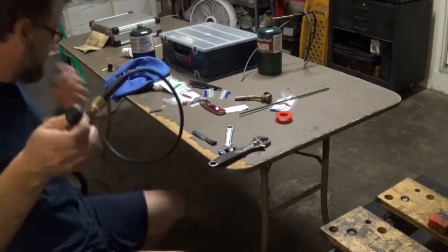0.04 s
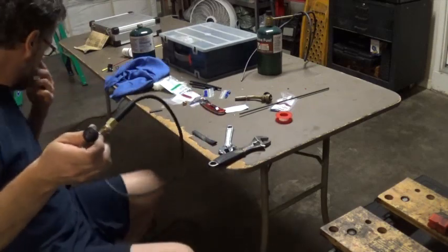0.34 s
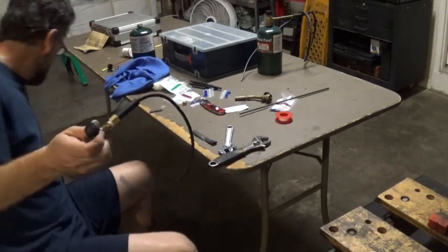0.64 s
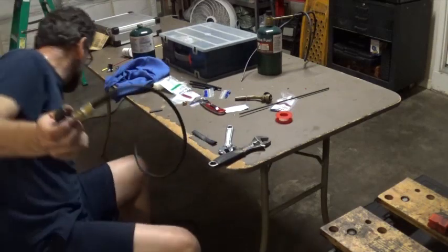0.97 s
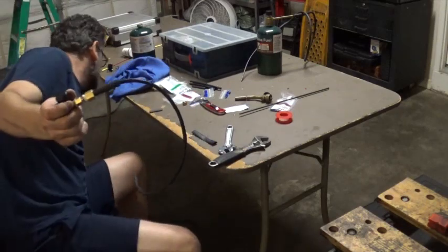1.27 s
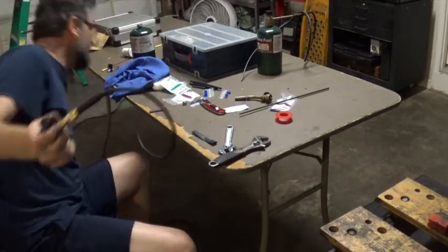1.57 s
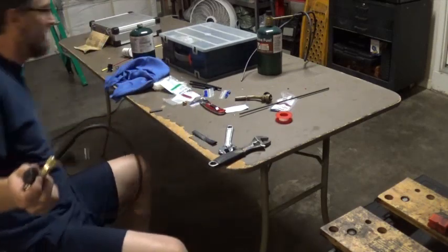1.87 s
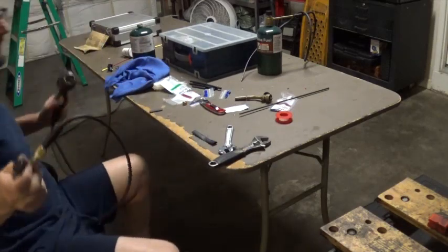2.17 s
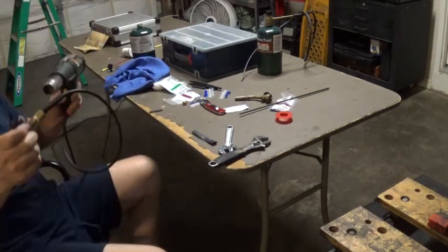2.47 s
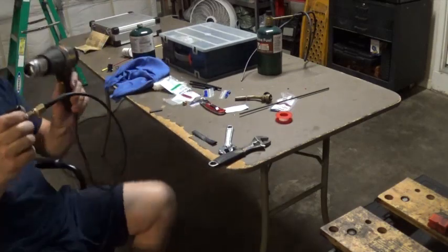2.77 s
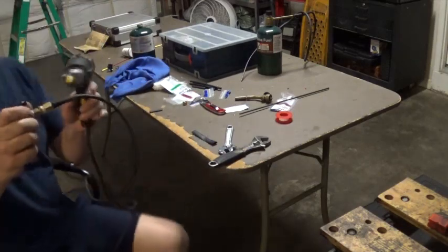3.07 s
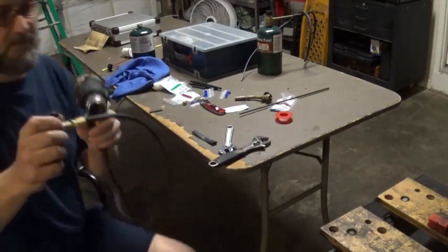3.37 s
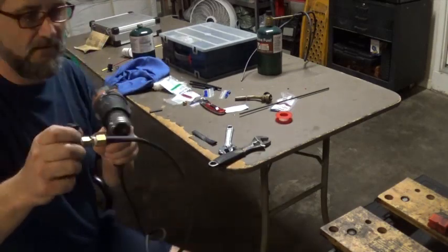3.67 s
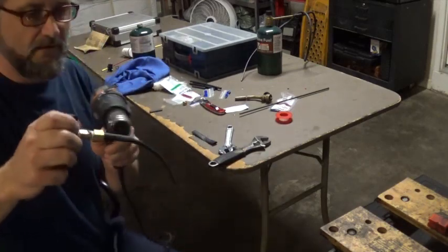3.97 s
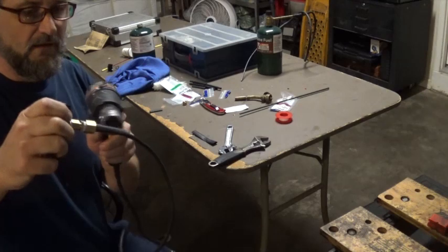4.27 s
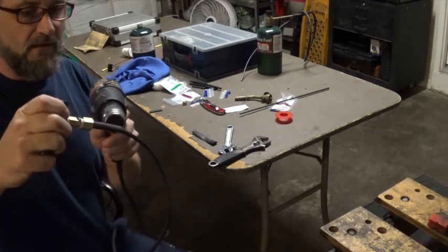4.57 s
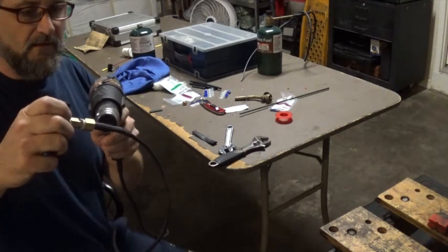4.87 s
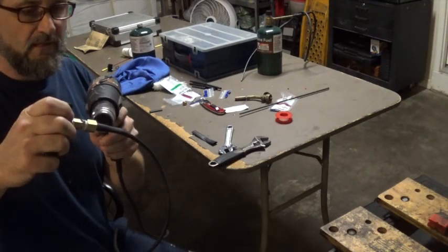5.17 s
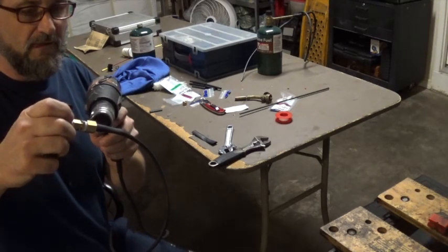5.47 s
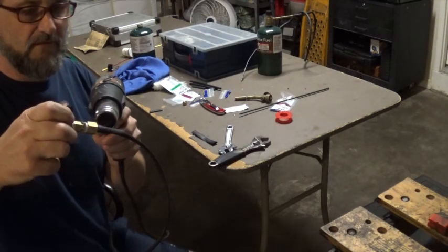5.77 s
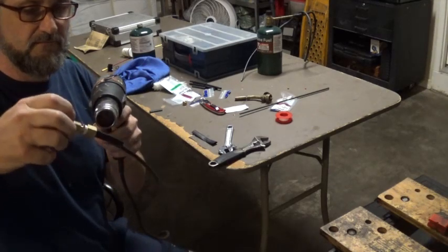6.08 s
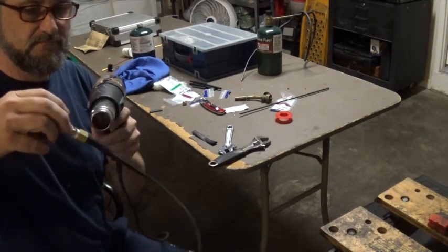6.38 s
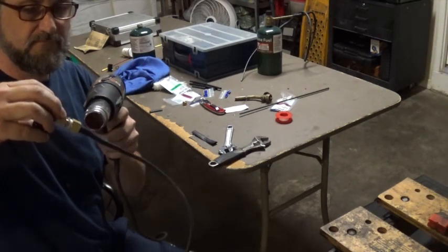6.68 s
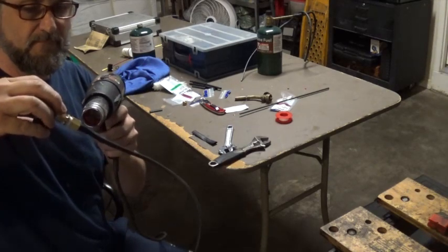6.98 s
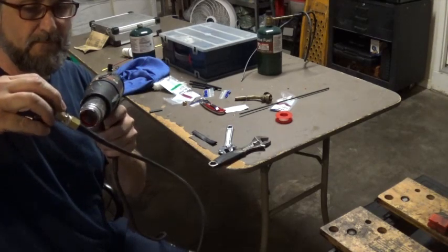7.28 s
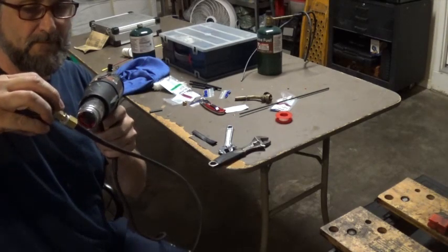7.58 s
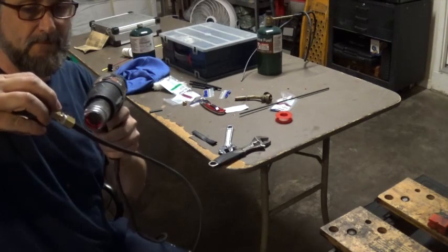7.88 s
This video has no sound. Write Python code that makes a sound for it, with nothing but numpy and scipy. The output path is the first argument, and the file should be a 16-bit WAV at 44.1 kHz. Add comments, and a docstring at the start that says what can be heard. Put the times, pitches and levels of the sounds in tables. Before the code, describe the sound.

Over faint garage room tone, a short dull scrape and a couple of plastic knocks sound in the first 0.3 seconds, followed by soft rustling. A light tap comes at 1.1 seconds, a metal tool clatters briefly on the table at 1.4, and small brass fittings tick around 2. At 2.2 seconds a switch snaps and an electric heat gun spins up with a rising whine. A hollow case clacks at 2.4, and the switch clicks sharply to high at 2.7. By about 3.3 seconds the gun is at full speed, a steady rush of air with nozzle hiss and a wavering high fan whistle. Around 3.7 the air jet briefly brushes a hose. The gun keeps blowing until the end at about 8 seconds, fairly close and slightly left, its tone shifting gently as it is moved. The room adds a short echo.

```python
"""A bare garage: tools knock, rustle and clatter at a work table as an electric heat gun is picked up.
Each contact rings a body's modes and the room answers. The switch snaps and the motor spins up to
about 235 turns a second: air rushes through the barrel's resonances and hisses out of the nozzle,
and the fan whines on multiples of the shaft speed, strongest on the 22nd."""
import sys
import numpy as np
from scipy import signal
from scipy.fft import rfft, irfft, next_fast_len
from scipy.io import wavfile
from scipy.ndimage import uniform_filter1d, map_coordinates

SR = 44100
rng = np.random.default_rng(int(sys.argv[2]) if len(sys.argv) > 2 else 0)


def dump(signal):
    """Clip the signal to [-1, 1] and save it as 16-bit WAV at the path in sys.argv[1]."""
    limited = np.clip(np.atleast_2d(signal).T, -1, 1)
    pcm = np.round(limited * 32767).astype(np.int16)
    wavfile.write(sys.argv[1], SR, pcm)


N = 358533
BLADE_ORDER = 22  # blade tone / shaft speed


def amp(db):
    """dB to gain."""
    return 10 ** (np.asarray(db) / 20)


def unit(x):
    """Scale to rms 1."""
    return x / np.sqrt(np.mean(x ** 2) + 1e-20)


def along(points, hz):
    """Read (f/Hz, value) points on a log axis."""
    f, v = np.transpose(points)
    return np.interp(np.log(hz + 1), np.log(f + 1), v)


def curves(rows):
    """One value per sample for each column after t/s."""
    s, *cols = np.transpose(rows)
    return [np.interp(np.arange(N) / SR, s, c) for c in cols]


def wobble(rate_hz):
    """Smooth random curve, rate_hz knots a second."""
    coarse = np.arange(0, N + 256, 256)
    knots = rng.standard_normal(int(N * rate_hz / SR) + 4)
    smooth = map_coordinates(knots, [coarse * rate_hz / SR], mode="nearest")
    return np.interp(np.arange(N), coarse, smooth)


def filtered(x, response):
    """Apply a complex frequency response."""
    n = x.shape[-1]
    m = next_fast_len(n + 8192)
    return irfft(rfft(x, m) * response(np.fft.rfftfreq(m, 1 / SR)), m)[..., :n]


def resonances(modes, f):
    """Causal response of (f/Hz, width/Hz, level/dB) modes of alternating sign."""
    return sum((-1) ** k * amp(db) * 1j * f * width / (centre ** 2 - f * f + 1j * f * width)
               for k, (centre, width, db) in enumerate(modes))


def spread(pair):
    """Two unrelated signals become a partly correlated left and right."""
    likeness = [(30, 0.92), (90, 1), (280, 1), (600, 0.95), (1500, 0.89), (5000, 0.88), (9000, 0.8),
                (13000, 1)]  # f/Hz, left-right correlation
    turn = lambda hz: np.arccos(np.clip(along(likeness, hz), -1, 1)) / 2
    mid, side = filtered(pair, lambda hz: np.array([np.cos(turn(hz)), np.sin(turn(hz))]))
    return np.array([mid + side, mid - side])


def noise(colour):
    """Stereo noise, rms 1, shaped by (f/Hz, level/dB) points."""
    return unit(spread(filtered(rng.standard_normal((2, N)), lambda hz: amp(along(colour, hz)))))


def stroke(start_s, hold_s, db, rise_s, fall_db_per_s):
    """Gain of one rubbing movement: rise, hold, decay."""
    t = np.arange(N) / SR - start_s
    return np.clip(t / rise_s, 0, 1) * amp(db - fall_db_per_s * np.maximum(t - rise_s - hold_s, 0))


def add(track, s, sound):
    """Mix a sound in at time s."""
    part = track[:, round(s * SR):][:, :sound.shape[1]]
    part += sound[:, :part.shape[1]]


def garage_tail():
    """Fresh echo of energy 1: table and floor answer at once, then the walls; top treble dies first."""
    reverb = [(200, 1), (1000, 0.59), (3000, 0.74), (6000, 0.69), (10000, 0.53), (15000, 0.23)]  # f/Hz, t60/s
    hz, t, z = signal.stft(rng.standard_normal((2, SR)), SR, nperseg=256)
    decay = amp(-60 * t / along(reverb, hz)[:, None]) + 0.5 * amp(-60 * t / 0.033)
    tail = signal.istft(z * decay, SR, nperseg=256)[1][:, :SR]
    tail = spread(tail * (1 - np.exp(-np.arange(SR) / SR / 0.002)))
    return tail / np.linalg.norm(tail[0])


def blow(modes, hardness, t60_s, room_db, push):
    """One contact: a push and a chatter dying in t60_s ring a body; the garage answers."""
    t = np.arange(SR // 8) / SR
    chatter = rng.standard_normal(len(t)) * np.exp(-np.log(1000) * t / t60_s)
    impulse = (t == 0).astype(float)
    force = chatter / np.linalg.norm(chatter) + push * impulse
    both = filtered(np.array([force, impulse]), lambda f: resonances(modes, f) * amp(along(hardness, f)))
    direct, ring = np.sqrt(0.0022 * SR) * both / np.linalg.norm(both, axis=1, keepdims=True)
    out = amp(room_db) * signal.fftconvolve(ring[None], garage_tail(), axes=1)
    out[:, :len(t)] += direct
    return out


def strikes(contacts, modes, t60_s, room_db, push):
    """Contacts on one object; harder ones are brighter."""
    out = np.zeros((2, N))
    for s, db, treble_db in contacts:
        hardness = [(3000, 0.006), (10000, treble_db)]
        add(out, s, amp(db) * blow(modes, hardness, t60_s, room_db, push))
    return out


def knocks(contacts, modes):
    """Contacts on plastic: soft ones thud, hard ones snap."""
    out = np.zeros((2, N))
    for s, db, thud_db, body_db, snap_db, t60_s, room_db in contacts:
        hardness = [(480, thud_db - 7), (850, thud_db), (1600, body_db), (3200, body_db), (9500, snap_db)]
        add(out, s, amp(db) * blow(modes, hardness, t60_s, room_db, push=0.81))
    return out


def background():
    """Still garage air with a faint hum."""
    colour = [(15, -72), (25, -42), (91, -30), (113, -19.5), (160, -14), (188, -9.5), (297, -3.5),
              (331, -5.5), (378, -5), (457, -6.5), (537, -6.5), (782, -8), (1050, -10.5), (1140, -11.5),
              (15500, -28.5)]  # f/Hz, level/dB
    tones = [(92, -86), (120, -80), (468, -69), (775, -76), (872, -67.5)]  # f/Hz, level/dB
    t = np.arange(N) / SR
    hum = sum(amp(db) * np.sqrt(2) * np.sin(2 * np.pi * (hz * t + rng.random())) for hz, db in tones)
    return amp(-54) * noise(colour) + hum


def scrape():
    """A short, dull, uneven rub."""
    colour = [(120, -51), (200, -20), (537, -5.5), (762, -5), (983, -3), (1170, -9), (1830, -5),
              (1980, -10), (3200, -12), (3810, -20), (9000, -31), (11700, -77)]  # f/Hz, level/dB
    gain = stroke(start_s=0, hold_s=0.097, db=-43.5, rise_s=0.004, fall_db_per_s=76)
    return gain * amp(1.2 * wobble(86)) * noise(colour)


def shell_knocks():
    """Knocks ring a plastic shell."""
    contacts = [(0.0917, -22, 2.5, -3.5, -10.5, 0.011, 1), (.1135, -40, 2, -1, -14, .015, 4),
                (0.2512, -31.5, -5, -7, -12, 0.013, 3), (.264, -44, -20, -10, -5, .02, 2),
                (.834, -54, -14, 5, -4.5, .01, -1)]  # t/s, level/dB, thud/dB, body/dB, snap/dB, t60/s, room/dB
    modes = [(970, 280, -0.5), (1560, 630, -0.5), (2070, 620, 0), (3500, 920, -4.5), (5600, 2000, -5.5),
             (10300, 3500, -9)]  # f/Hz, width/Hz, level/dB
    return knocks(contacts, modes)


def rustle():
    """Things rub softly as the hand reaches for the gun."""
    rubs = [(0.17, 0.22, -51.5), (0.82, 0.22, -55), (1.325, 0.077, -48), (1.977, 0.18, -52)]  # t/s, hold/s, level/dB
    colour = [(300, -26), (900, -7), (1500, -0.5), (2400, 0), (4000, -2), (6000, -3.5), (9500, -7.5),
              (12000, -16), (15000, -25)]  # f/Hz, level/dB
    gain = sum(stroke(*rub, rise_s=0.097, fall_db_per_s=52) for rub in rubs)
    return gain * amp(0.84 * wobble(38.6)) * noise(colour)


def tap():
    """One light, dull contact."""
    contacts = [(1.143, -32.5, -5)]  # t/s, level/dB, treble/dB
    modes = [(1510, 210, 0.5), (2300, 400, -2), (2750, 280, 0.5), (3600, 450, -5), (4900, 700, -14),
             (9000, 2500, -22)]  # f/Hz, width/Hz, level/dB
    return strikes(contacts, modes, t60_s=0.011, room_db=-2.5, push=0.7)


def tool_clatter():
    """A metal tool clatters on the table, slightly right."""
    contacts = [(1.4043, -18, -2.5), (1.4098, -28, -2), (1.4162, -23.5, -2), (1.4192, -23.5, 1.5),
                (1.4228, -26, 3), (1.4315, -22, -1)]  # t/s, level/dB, treble/dB
    modes = [(733, 150, -8.5), (1250, 400, -6), (2080, 480, -2), (2560, 370, -3.5), (3070, 200, -1),
             (3380, 260, -1.5), (5310, 350, 1), (5900, 260, -2), (6560, 630, 0), (7100, 230, 2.5),
             (7600, 460, -6), (9600, 530, -5), (10700, 700, -10.5), (13600, 1600, -20)]  # f/Hz, width/Hz, level/dB
    return strikes(contacts, modes, t60_s=0.046, room_db=4, push=0.4) * amp([[-0.2], [0.2]])


def brass_ticks():
    """Small brass fittings tick."""
    contacts = [(1.767, -51, 6), (1.9895, -37, -8), (2.0448, -25.5, 5), (2.0478, -31, 1)]  # t/s, level/dB, treble/dB
    modes = [(890, 1700, -11), (3670, 740, -2), (5230, 550, 5.5), (6200, 600, 5.5), (7950, 1600, 0.5),
             (9700, 420, 4.5), (10700, 1200, 0), (12400, 560, -19)]  # f/Hz, width/Hz, level/dB
    return strikes(contacts, modes, t60_s=0.021, room_db=1, push=0.33)


def switch_snaps():
    """The switch rings the handle: it snaps on, settles, then snaps to high."""
    contacts = [(2.2452, -25, 0.5, -1.5, -9.5, 0.014, 1), (2.289, -38, -4, -3, -8, 0.012, 4),
                (2.711, -20.5, -25, -6, 7, 0.02, -11)]  # t/s, level/dB, thud/dB, body/dB, snap/dB, t60/s, room/dB
    modes = [(680, 210, -1.5), (970, 78, 2), (1350, 200, -1.5), (1880, 290, -2), (2320, 190, -0.5),
             (3600, 900, -13), (4650, 300, -5), (6200, 360, -4), (7740, 620, -8.5), (9100, 380, -6),
             (11000, 900, -8.5)]  # f/Hz, width/Hz, level/dB
    return knocks(contacts, modes)


def spin_up(on_s=2.245, surge_s=0.06, creep_s=0.3, creep_share=0.52, high_s=2.705, break_s=0.02):
    """Share of full motor speed: surge, creep, and a sag as power breaks on the way to high."""
    t = np.arange(N) / SR
    since_on = np.maximum(t - on_s, 0)
    creep = creep_share * np.exp(-since_on / creep_s)
    surge = (1 - creep_share) * np.exp(-since_on / surge_s)
    since_break = np.maximum(t - high_s, 0)
    sag = 0.017 * np.minimum(since_break / break_s, 1) * np.exp(-since_break / creep_s)
    return np.clip(1 - creep - surge - sag, 0, 1)


def barrel(turn_at_s=3.2, turn_s=0.38, raised_db=1):
    """Air rings the barrel; its modes shift as the raised gun is turned onto a hose."""
    raised_modes = [(665, 20, -1.5), (835, 38, 0), (1208, 72, 1.5), (1730, 52, 3), (2550, 200, -2),
                    (2920, 100, -4.5), (3620, 310, -1.5)]  # f/Hz, width/Hz, level/dB
    turned_modes = [(577, 54, -12.5), (776, 30, -2), (1110, 110, -11), (1248, 35, 1.5), (1680, 80, -4),
                    (1790, 31, 2.5), (2508, 130, -4), (2940, 24, -6.5), (3540, 144, -4.5)]  # f/Hz, width/Hz, level/dB

    def ring(modes):
        return unit(spread(filtered(rng.standard_normal((2, N)), lambda f: resonances(modes, f))))

    turned = np.clip((np.arange(N) / SR - turn_at_s) / turn_s, 0, 1)
    raised = amp(raised_db) * np.sqrt(1 - turned) * ring(raised_modes)
    return raised + np.sqrt(turned) * ring(turned_modes)


def drifting(x, depth_db):
    """Patches of colour come and go as reflections shift around a hand-held source."""
    z = signal.stft(x, nperseg=1024)[2]
    patches = uniform_filter1d(rng.standard_normal(z.shape[1:]), size=5, axis=0)
    patches = uniform_filter1d(patches, size=30, axis=1)
    return unit(signal.istft(z * amp(depth_db * unit(patches)), nperseg=1024)[1][:, :N])


def aimed(rush):
    """Three bands of the rush swell and sink as the hand steers the gun."""
    bands = [(470, 110), (3620, 300), (4520, 450)]  # f/Hz, half-width/Hz
    levels = [(3.3, 0, -3.5, -2), (3.8, -1, 2, 2), (4.2, -3, -3.5, 1), (4.6, 2, 2, 0.5),
              (5.0, 2.5, -2.5, -1), (5.5, -1, -0.2, -0.5), (6.0, 0, -2, -3.5), (6.8, 0, 1, -1.5),
              (7.7, -1, 1.4, -1), (8.13, 0, 1, -4)]  # t/s, low body/dB, rasp/dB, upper edge/dB
    out = rush.copy()
    for (centre, width), db in zip(bands, curves(levels)):
        out += (amp(db) - 1) * filtered(rush, lambda hz: np.exp(-((hz - centre) / width) ** 4))
    return out


def air(share, near_db, aim_db, rush_db=-29.6, hiss_db=-42.9, flutter_db=0.8):
    """Fan turbulence rushes through the barrel and hisses out of the nozzle, louder with speed."""
    rush_colour = [(35, -57), (100, -29), (200, -21), (300, -12.5), (480, -11), (680, -5.5), (900, -3.5),
                   (1000, -6), (1100, -1.5), (1360, 0.5), (1460, -3), (2000, 0), (2250, -6), (2700, -4),
                   (3150, -5), (3700, -2.5), (4500, -8.5), (4950, -13), (5400, -11), (6000, -15.5),
                   (9000, -44)]  # f/Hz, level/dB
    hiss_colour = [(3500, -21.5), (4900, -3), (5550, 7.5), (6200, -0.5), (6800, -4), (7600, -1), (8700, -4),
                   (9600, -0.5), (11000, -8), (12400, -16), (13500, -14), (15500, -36)]  # f/Hz, level/dB
    # the broad rush gains on the resonances as the flow quickens
    rush = aimed(drifting(share * noise(rush_colour) + barrel(), depth_db=0.75))
    rush *= amp(rush_db + near_db + 0.2 * wobble(12))
    hiss_gain = amp(hiss_db + 0.57 * aim_db + flutter_db * wobble(14))
    hiss = hiss_gain * drifting(noise(hiss_colour), depth_db=1.2)
    return share ** 0.76 * (rush + np.sqrt(share) * hiss)


def fading(hz, rate_hz=3, ripple_hz=45):
    """Random level curve of a line: it moves with time and as the pitch crosses the room's ripples."""
    place = rate_hz * np.arange(N) / SR + hz / ripple_hz
    knots = rng.standard_normal(1024)
    return np.interp(place, np.arange(len(knots)), knots)


def whine(share, near_db, aim_db, fading_db=1.8, climb_fading_db=1.5, rough=0.91, room_db=-8):
    """Fan and motor: shaft harmonics flicker as they climb, then settle; the echo smears them."""
    harmonics = [(2,-63), (3,-59), (4,-53), (5,-46), (6,-53), (7,-51), (8,-53), (9,-56), (10,-62), (11,-55),
                 (13,-58), (14,-62), (15,-58), (16,-60), (17,-61), (18,-53), (19,-55), (20,-55), (21,-65),
                 (23,-50), (24,-56), (25,-53), (26,-64), (27,-51), (28,-57), (29,-55.5), (30,-62), (32,-52),
                 (33,-55.5), (34,-57.5), (35,-52), (36,-59.5), (37,-57.5), (38,-62), (39,-58.5), (41,-61),
                 (42,-64), (43,-55), (44,-57), (45,-62), (46,-60), (48,-55), (49,-62), (50,-60), (51,-56),
                 (52,-60), (53,-60), (54,-72), (56,-68), (57,-69), (58,-72), (60,-75), (63,-73)]  # shaft order, level/dB
    blade_pitch = [(3.5, 5186), (3.8, 5197), (4.05, 5190), (4.3, 5180), (4.5, 5170), (4.59, 5174),
                   (5.47, 5165), (5.67, 5202), (6.73, 5180), (7.48, 5202), (8.13, 5162)]  # at full speed: t/s, f/Hz
    upper_swell = [(3.4, -2.5), (3.85, -1.5), (4.55, -0.5), (4.95, -0.5), (5.55, 0.5), (5.72, -1),
                   (5.88, 1), (6.02, -2), (8.13, 1)]  # t/s, level/dB
    climb_lift = [(4000, 3), (4500, 5), (4900, 7), (5700, 7), (6300, 4), (7200, 6), (8500, 4), (10000, 4.5),
                  (11500, 1.5), (12500, 0.5)]  # boost during spin-up: f/Hz, level/dB
    housing_peaks = [(1205, 17, 12), (1735, 20, 6), (4400, 45, 3), (4760, 50, 3), (5240, 65, 8)]  # f/Hz, half-width/Hz, level/dB
    jitter = (0.00064 + 0.003 * (1 - share)) * wobble(40)
    shaft_hz = share * curves(blade_pitch)[0] / BLADE_ORDER
    angle = 2 * np.pi * np.cumsum(shaft_hz * (1 + jitter)) / SR
    climbing, turbulence = 1 - share ** 40, share ** 6
    swell_db, = curves(upper_swell)
    orders, levels_db = np.transpose(harmonics)
    smooth_db = uniform_filter1d(levels_db, size=7) + along(climb_lift, orders * shaft_hz[-1])
    lines = np.zeros(N)
    for order, own_db in harmonics:
        hz = order * shaft_hz
        flicker = fading(hz)
        db = own_db + fading_db * flicker
        for peak_hz, width_hz, peak_db in housing_peaks:
            if hz[-1] > peak_hz:  # only lines that climb through the peak
                db += peak_db / (1 + ((hz - peak_hz) / width_hz) ** 4)
        phase = order * angle + 2 * np.pi * rng.random()
        tone = np.cos(phase)
        if order < 17:
            # turbulence roughens the low lines as the flow builds
            narrow_noise = tone * wobble(55) + np.sin(phase) * wobble(55)
            tone = tone * (1 - 0.74 * turbulence) + rough * turbulence * narrow_noise
        else:
            # a climbing upper line takes the level of the pitch it is passing
            passing_db = np.interp(order * share, orders, smooth_db)
            db += swell_db + climbing * (passing_db - own_db + climb_fading_db * flicker)
        lines += amp(db) * tone
    lines *= np.sqrt(2) * amp(0.5 * aim_db - 0.5) * share
    echo = signal.fftconvolve(lines[None], garage_tail(), axes=1)[:, :N]
    return amp(0.5 * near_db) * lines + amp(room_db) * echo + whistles(angle, share)


def case_clack():
    """A hollow case clacks and rebounds."""
    contacts = [(2.3588, -18, 1.5), (2.372, -23.5, 3), (2.388, -31, 2), (2.401, -32, -2)]  # t/s, level/dB, treble/dB
    modes = [(935, 630, -15), (1870, 580, 4.5), (2350, 280, 10.5), (3320, 220, 9), (3720, 510, 3),
             (6500, 5200, -17)]  # f/Hz, width/Hz, level/dB
    return strikes(contacts, modes, t60_s=0.032, room_db=2.5, push=0.45)


def whistles(angle, share, waver_rad=0.3, upper_order=40):
    """Near full speed the blade tone sings, wavering in the turbulence, with a thinner whistle above."""
    blade_levels = [(3.3, -51), (3.34, -41), (3.46, -48), (4.9, -46), (5.01, -52), (5.21, -43.5),
                    (5.25, -51), (5.38, -41.5), (5.64, -48), (5.82, -47), (6.0, -43), (6.16, -47),
                    (6.62, -41), (7.36, -47.5), (7.8, -46), (8.0, -42), (8.13, -41)]  # t/s, level/dB
    upper_levels = [(3.4, -58), (3.7, -45), (4.1, -55), (4.45, -51), (4.92, -58), (5.2, -47.5), (5.7, -49),
                    (6.6, -48), (7.2, -49.5), (7.6, -46), (8.13, -52)]  # t/s, level/dB
    blade_db = 3.6 + curves(blade_levels)[0] + 0.84 * np.array([wobble(2.45), wobble(3.15)])
    upper_db = 0.5 + curves(upper_levels)[0] + 1.3 * wobble(9.9)
    blade = amp(blade_db) * np.cos(BLADE_ORDER * angle + waver_rad * wobble(70))
    upper = amp(upper_db) * np.cos(upper_order * angle)
    return np.sqrt(2) * share ** 18 * (blade + upper)


def hose_brush():
    """The air jet briefly brushes the hose."""
    colour = [(50, -49), (200, -12), (320, -15), (425, 7), (560, -16), (1000, -8), (1350, 4), (2300, 4),
              (3300, 1.5), (5000, -8), (10000, -19), (15000, -24)]  # f/Hz, level/dB
    return stroke(start_s=3.52, hold_s=0.03, db=-31, rise_s=0.17, fall_db_per_s=102) * noise(colour)


def heat_gun():
    """Motor speed drives air and whine as the gun is brought round; all but the bass sits slightly left."""
    pose = [(2.4, -7, -4.5), (2.85, -4.5, 0), (3.3, -1, -1), (3.8, -0.5, 1), (4.6, 0.5, -1.7),
            (5.0, -1.05, -3), (5.6, -0.3, 2), (6.7, 0.14, 2), (8.1, -0.5, 0.3)]  # t/s, nearness/dB, aim/dB
    left_tilt = [(300, 0), (1000, 0.53), (3000, 0.26), (8000, 0.88), (13000, 0.031)]  # f/Hz, level/dB
    share = spin_up()
    near_db, aim_db = curves(pose)
    gun = air(share, near_db, aim_db) + hose_brush() + whine(share, near_db, aim_db)
    return filtered(gun, lambda hz: amp([along(left_tilt, hz), -along(left_tilt, hz)]))


def scene():
    """Handling noises, then the running heat gun."""
    contacts = tool_clatter() + case_clack() + brass_ticks() + tap() + shell_knocks() + switch_snaps()
    return contacts + rustle() + scrape() + heat_gun() + background()


def record(dry, top_hz=15600):
    """Thin the deep bass, roll off the top, cut above top_hz."""
    response = [(20, -12), (70, 0), (13000, -0.5), (15500, -8)]  # f/Hz, level/dB
    return filtered(dry, lambda hz: amp(along(response, hz)) * (hz < top_hz))


dry = scene()
out = record(dry)
dump(out)
```